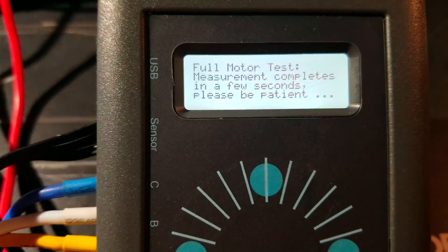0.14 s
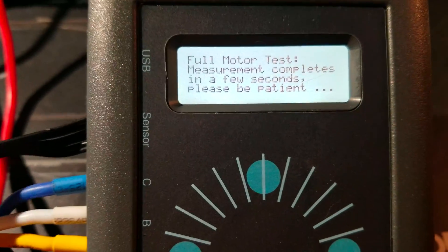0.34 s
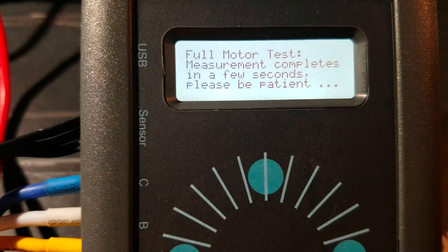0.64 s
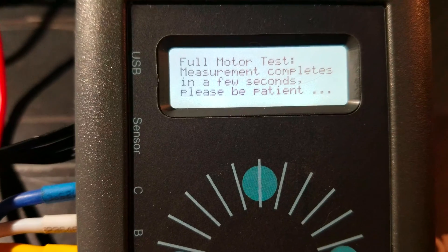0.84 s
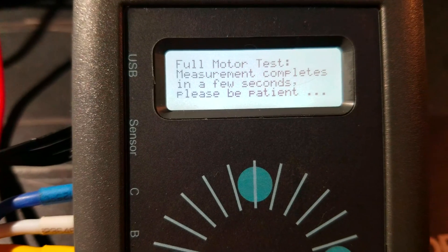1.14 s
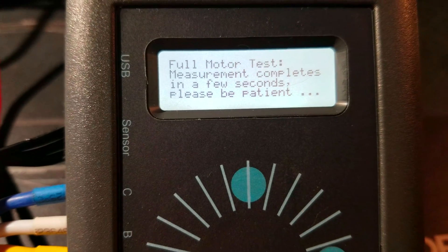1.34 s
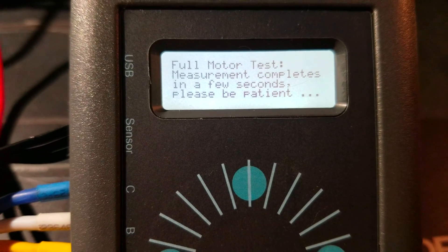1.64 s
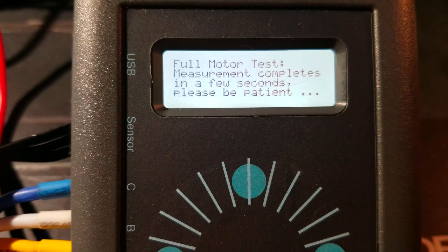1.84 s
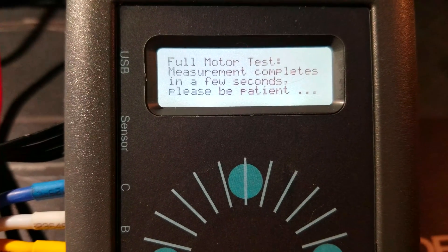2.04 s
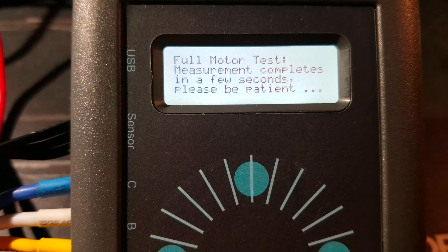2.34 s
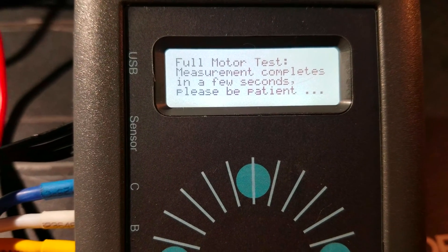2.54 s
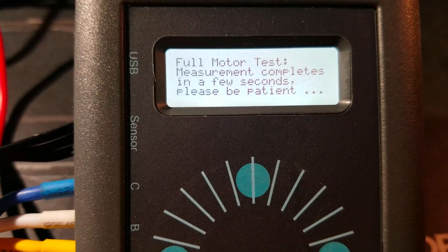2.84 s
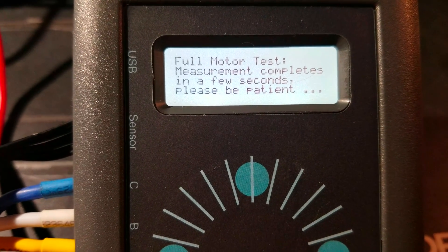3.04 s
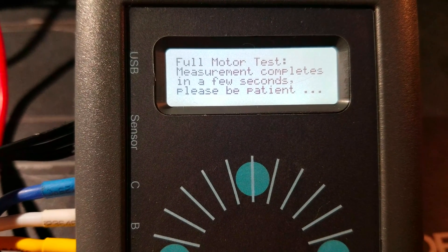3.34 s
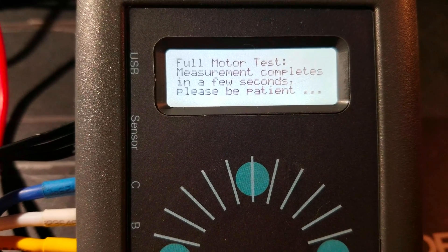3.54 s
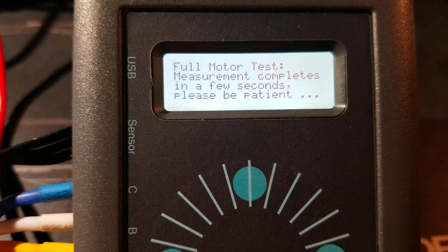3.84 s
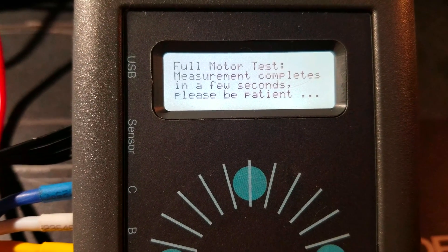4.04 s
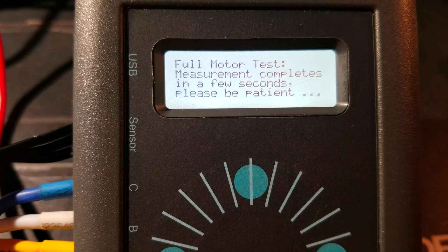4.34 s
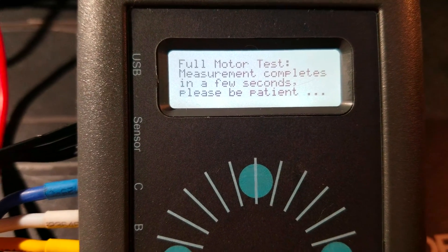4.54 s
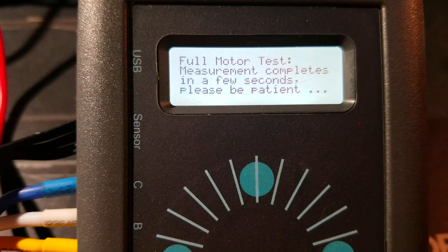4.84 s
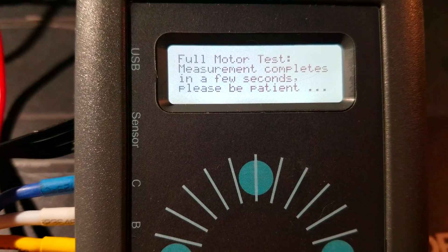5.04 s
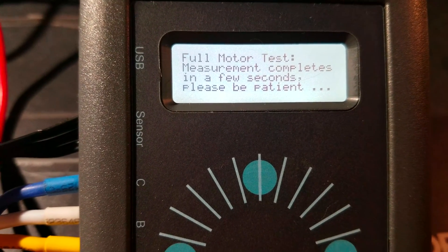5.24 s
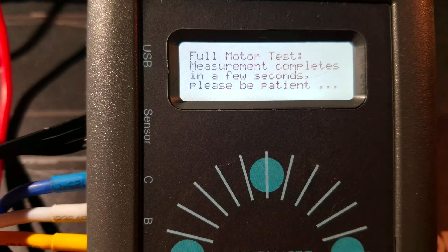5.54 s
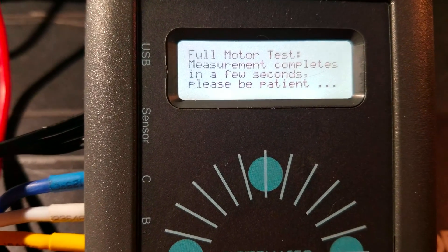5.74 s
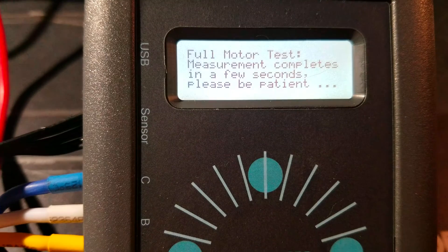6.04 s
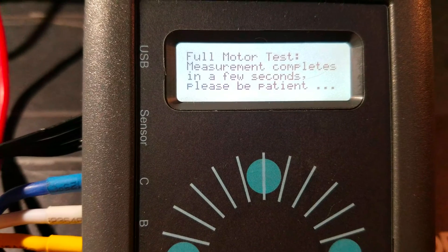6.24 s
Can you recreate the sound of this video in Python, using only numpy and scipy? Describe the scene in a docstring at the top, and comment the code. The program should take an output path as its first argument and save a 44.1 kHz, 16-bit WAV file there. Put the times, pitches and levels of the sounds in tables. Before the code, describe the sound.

A small electric motor knocks into life, whines upward to a rattling full speed, steps down with hard clacks, then coasts into a smoother, slower idle.

```python
"""A small brushless motor on a bench tester, close to a two-port microphone in a quiet room.
It starts with a knocking purr and runs up in a rising whine, with hard clacks and a thin climbing hiss.
It holds full speed, slows to half speed with more clacks, then coasts into a smoother, slower idle.
The rotor sings on multiples of its turn rate, its bearings rattle and hiss as impacts ring the case,
and the drive's switching whistles on top; low room air and mains hum lie behind it throughout."""
import sys
import numpy as np
from scipy import signal
from scipy.fft import rfft, irfft, next_fast_len
from scipy.io import wavfile
from scipy.ndimage import uniform_filter1d

SR = 44100
rng = np.random.default_rng(int(sys.argv[2]) if len(sys.argv) > 2 else 0)


def generate_wav(sig):
    """Save sig (samples, or channels by samples) to the path in sys.argv[1] as 16-bit PCM at SR."""
    pcm = np.round(np.clip(np.atleast_2d(sig).T, -1, 1) * 32767).astype(np.int16)
    wavfile.write(sys.argv[1], SR, pcm)


N = 281225
TIME, FREQS = np.arange(N) / SR, np.fft.rfftfreq(N, 1 / SR)  # seconds, Hz

TOP_SPEED, IDLE_SPEED = 370.7, 160.15  # turns per second
TOP_S, IDLE_S = 1.17, 4.625  # the run-up ends; the rotor coasts down to idle
KNOCK_ANGLE = .66  # where in the turn the rotor strikes, as a share of a turn

# The microphone's two ports. Each row: frequency in Hz, likeness of the ports from 0 to 1,
# phase lead of the right port in radians on top of its delay.
PORTS = [(100, 0.98, -0.08), (695, 0.76, 2.5), (1214, 0.66, 0), (1494, 0, 2.5), (1915, 0.24, 0.25),
         (2200, 1, 0.5), (2360, 0.77, 0.5), (3090, 0.6, -0.5), (3295, 0.13, -0.5), (3748, 0.98, -0.57),
         (4307, 1, -0.27), (4180, 0.24, 1.5), (4900, 0.73, -0.48), (6620, 0.66, -0.65), (7220, 1, -1.5),
         (8120, 0.76, -3.5), (9500, 0.3, -6), (10800, 0.3, -8), (12300, 0.5, -9), (13000, 0.9, -6.5),
         (14100, 0.4, -8.5), (15200, 0.8, -10.5)]


def amp(db):
    """Amplitude factor of a level in dB."""
    return 10 ** (np.asarray(db) / 20)


def unit(x):
    """The signal brought to rms 1."""
    return x / np.sqrt(np.mean(x ** 2) + 1e-20)


def over_pitch(rows, hz):
    """Each column of a spectrum, read on a log-frequency axis."""
    row_hz, *columns = np.transpose(rows)
    return np.array([np.interp(np.log(hz + 1), np.log(row_hz), column) for column in columns])


def wander(rate_hz):
    """Smooth chance of rms 1, up to about the given rate."""
    size = next_fast_len(N, True)
    spectrum = rfft(rng.standard_normal(size))
    smoothing = 1 + (np.fft.rfftfreq(size, 1 / SR) / rate_hz) ** 4
    return unit(irfft(spectrum / smoothing, size)[:N])


def port_phase(hz):
    """Phase at the left and right port; sound reaches the left one first."""
    delay_samples = 16
    lead = over_pitch(PORTS, hz)[1] - 2 * np.pi * hz * delay_samples / SR
    return np.array([0 * lead, lead])


def at_ports(a, b):
    """Spectra at both ports from two unrelated noises, shared as far as the ports are alike."""
    same = np.clip(over_pitch(PORTS, FREQS)[0], 0, 1)
    a, b = rfft(a), rfft(b)
    right = same * a + np.sqrt(1 - same ** 2) * b
    return np.array([a, right]) * np.exp(1j * port_phase(FREQS))


def tone(cycles, hz):
    """A sine of rms 1 at both ports."""
    return np.sqrt(2) * np.cos(2 * np.pi * (cycles + rng.random()) + port_phase(hz))


def set_speed(start_speed=60.2, overshoot_turns_per_s=2.4, overshoot_s=.6, settle_s=.108):
    """Turns per second: straight ramps, a slight overshoot at the top, then a coast down to idle."""
    # The tester's ramps. Each row: start in seconds, end in seconds, turns per second reached.
    ramps = [(0, .42, 189.6), (.42, .69, 268), (.69, 1.17, 370.7), (2.69, 3.2, 265), (3.2, 3.49, 185.2)]
    speed = np.full(N, start_speed)
    for start, end, reached in ramps:
        speed = speed + (reached - speed) * np.clip((TIME - start) / (end - start), 0, 1)
    speed = speed + overshoot_turns_per_s * np.exp(-abs(TIME - TOP_S) / overshoot_s)
    return IDLE_SPEED + (speed - IDLE_SPEED) * np.exp(-np.maximum(TIME - IDLE_S, 0) / settle_s)


def driven_whine(speed, turns, crawl_octave_db=7.5, blur_per_order=0.012, strain_blur=0.25, start_db=11,
                 flutter_hz=20, slip_turns=0.0032, full_strain=200, dip_db=-12, dip_s=0.037):
    """Rotor orders grow with speed, sweep through the case's resonances and shake with the loose rotor."""
    # Rotor tones under drive, ahead of the case. Each row: multiple of the turn rate, level in dB at full
    # speed, level in dB at half speed, dB added at full strain while the speed ramps.
    driven_orders = [(1, -2, -3.5, 4), (2, 9, 8.5, 0), (3, -4, -5, 6), (4, 4, -12.5, 5.5),
                     (5, -12.5, -10, 12), (6, 7, 1.5, -3), (7, 0, -0.5, 1), (8, 7, 5, -2), (9, 6.5, 0, -1),
                     (10, 8.5, -3, 0), (11, 7, 0, 0.5), (12, 11, -0.5, -2), (13, 6.5, 0, -2.5),
                     (14, 9, -0.5, 1), (15, 7.5, 0, -1.5), (16, 3, 4, -0.5), (17, 1, -5, -11),
                     (18, 5, 5, -3), (19, -8, 3, -1), (20, 3, 0, -17), (21, -3, -7, 3), (22, -1, 1, -4),
                     (23, -2, -4, -10)]
    # Orders that radiate mostly to the left at half speed and below.
    # Each row: multiple of the turn rate, dB added at the right port.
    leftward_orders = [(2, -7), (4, -4), (8, -10), (11, -3), (18, -7)]
    # How motor case and bench pass the tones. Each row: frequency in Hz, left gain in dB, right gain in dB.
    case_gain = [(125, -57, -59), (204, -58.5, -64), (262, -53.5, -61), (314, -59.5, -56.5),
                 (347, -70, -77), (383, -53.5, -64), (460, -57.5, -59), (525, -52.5, -62), (561, -55, -56),
                 (617, -75, -64), (663, -54, -69), (700, -47, -58), (740, -46, -59), (790, -47.5, -57),
                 (890, -44, -49), (925, -48, -52), (1000, -50.5, -53), (1100, -56.5, -58),
                 (1170, -42.5, -56), (1290, -46, -54.5), (1330, -43.5, -51), (1460, -49, -48.5),
                 (1550, -50, -49.5), (1670, -41.5, -46), (1800, -52, -50.5), (1950, -44, -54),
                 (2080, -48, -51), (2225, -47, -48), (2410, -50.5, -51), (2740, -57, -57), (2840, -49, -50),
                 (2983, -46, -43), (3110, -44, -46), (3210, -46.5, -49), (3420, -47, -47.5),
                 (3530, -60, -50), (3900, -46, -46.5), (4060, -56, -56), (4270, -56, -52), (4500, -63, -60),
                 (4850, -61, -42.5), (5200, -54, -37.5), (5460, -55, -44.5), (6600, -55, -53),
                 (7340, -59, -39), (8100, -52, -60)]
    # A case mode howls briefly as a tone passes it. Each row: middle in seconds, half length in seconds,
    # frequency in Hz, half width in Hz, lift in dB.
    howl_rows = [(1.16, 0.029, 2990, 220, 4), (1.213, 0.043, 2990, 220, 8.5), (3.02, 0.021, 3050, 100, 2),
                 (3.16, .025, 3300, 80, 7), (3.208, 0.028, 785, 90, 11), (3.438, 0.086, 2960, 150, 5)]
    out = np.zeros((2, N))
    octaves = np.log2(speed / (TOP_SPEED / 2))  # above half speed
    # speeding up or braking loads the rotor unevenly, which shifts the balance of the orders
    acceleration = abs(np.gradient(set_speed())) * SR  # turns per second, per second
    strain = np.clip(uniform_filter1d(acceleration, SR // 10) / full_strain, 0, 1)
    howls = [(db * np.exp(-((TIME - s) / length) ** 2), hz, width) for s, length, hz, width, db in howl_rows]
    dip = dip_db * np.exp(-((TIME - TOP_S - dip_s / 2) / dip_s) ** 2)  # the main tone dips as the run-up ends
    for order, full_db, half_db, strain_db in driven_orders:
        hz = order * speed
        db = np.interp(octaves, [0, 1], [half_db, full_db])
        db = db + crawl_octave_db * np.minimum(octaves, 0) + strain_db * strain
        db = db + sum(howl * np.exp(-np.minimum(((hz - at) / width) ** 2, 20)) for howl, at, width in howls)
        if order == 2:  # the main tone is clear from the very start
            db = db + dip + start_db * np.interp(speed, [60, 140], [1, 0])
        ports_db = db + over_pitch(case_gain, hz)
        ports_db[1] += dict(leftward_orders).get(order, 0) * np.interp(octaves, [0, .5], [1, 0])
        # low orders stay nearly pure; a growing share of the higher ones is blurred, more under strain
        blur = np.clip(blur_per_order * max(order - 2, .5) + strain_blur * strain * (order > 4), 0, 1)
        flutter = np.sqrt(1 - blur) + np.sqrt(blur) * wander(flutter_hz)
        angle = turns + slip_turns * wander(flutter_hz)
        out += amp(ports_db) * flutter * tone(order * angle, hz)
    return out


def idle_whine(speed, turns, idle, mode_hz=1690, mode_width_hz=55, mode_db=8.5, slip_turns=0.0016,
               coast_db=-4.0, coast_speed=10, coast_above_hz=2400):
    """Running smoothly, every turn is alike: a tall stack of clean lines, lifted as one glides by a case mode."""
    # Rotor tones at idle. Each row: multiple of the turn rate, left level in dB, right level in dB.
    idle_orders = [(1, -61, -66), (2, -61, -53), (4, -56, -68), (5, -56, -61), (6, -45.5, -56.5),
                   (7, -70, -64), (8, -58, -57), (9, -54, -72), (10, -39, -46), (11, -57, -57),
                   (12, -47, -46), (13, -59, -62), (14, -58, -59), (16, -42, -43), (17, -60, -65),
                   (18, -55, -57), (19, -54, -53), (20, -49, -47), (21, -61, -60), (22, -58, -58),
                   (23, -59, -60), (24, -49, -49), (25, -55, -55), (26, -53, -53), (27, -57, -50),
                   (28, -56, -57), (29, -58, -54), (30, -55, -46), (31, -65, -51), (32, -56, -46),
                   (33, -62, -46), (34, -61, -43), (35, -60, -43), (36, -54, -44), (37, -61, -46),
                   (38, -60, -45), (39, -57, -45), (40, -56, -44), (42, -58, -55), (43, -60, -54),
                   (44, -58, -48), (45, -60, -45), (46, -58, -45), (47, -57, -50), (48, -54, -54),
                   (49, -56, -56), (50, -49, -62), (51, -57, -56), (52, -53, -60), (53, -54, -75),
                   (54, -56, -72), (55, -55, -75), (56, -57, -75)]
    # The balls roll at no whole multiple of the shaft.
    # Each row: multiple of the turn rate, left level in dB, right level in dB.
    ball_tones = [(10.55, -57, -64), (12.57, -58, -69), (16.57, -58, -58), (18.55, -58, -55),
                  (20.57, -53, -55), (22.55, -55, -55), (26.55, -54, -49), (28.57, -59, -56),
                  (29.58, -61, -52), (30.59, -53, -37), (31.56, -58, -44), (32.57, -58, -41),
                  (33.58, -61, -48), (34.55, -63, -47), (36.57, -64, -50), (39.56, -73, -54),
                  (40.57, -71, -55), (44.57, -58, -50), (45.58, -60, -50), (46.55, -61, -49),
                  (50.55, -58, -61)]
    out, on = np.zeros((2, N)), idle > 0
    unsettled = np.clip((speed[on] - IDLE_SPEED) / coast_speed, 0, 1)
    cage_turns = turns + slip_turns * wander(6.2)  # the balls slip a little against the shaft
    for rows, angle, peak_db in ((idle_orders, turns, mode_db), (ball_tones, cage_turns, 0)):
        for order, left_db, right_db in rows:
            hz = order * speed[on]
            lift_db = peak_db * np.exp(-((hz - mode_hz) / mode_width_hz) ** 2)
            # the upper lines stay weak while it still coasts
            lift_db = lift_db + coast_db * unsettled * (order * IDLE_SPEED > coast_above_hz)
            out[:, on] += amp([[left_db], [right_db]]) * amp(lift_db) * tone(order * angle[on], hz)
    return idle * out


def rattle_levels(idle, sway_db=0.54, sway_hz=9, idle_calm=0.43, crawl_speed=150, crawl_db=-14.5):
    """Level in dB of each band of the rattle: it follows speed and run-up current, and sways by chance."""
    # How the bearing rattle follows speed and drive; the rows are body, lower ring, upper ring, hiss, fizz.
    # Each row: level in dB at top speed, dB per octave of speed, dB at full run-up current, dB added at idle.
    rattle_law = [(-28.5, 0.33, 0, -7.5), (-25.5, 8, 6.5, -4.5), (-25.5, 5.5, 3, -5.5), (-25.5, 6, 8, -2),
                  (-25.5, 5.5, 2, -0.5)]
    # The rattle swells or drops briefly. Each row: middle in seconds, half length in seconds, change in dB.
    swells = [(0.133, 0.041, 3.5), (0.328, 0.037, 1), (0.464, 0.054, -2.5), (1.173, 0.052, -3.5),
              (1.286, 0.0093, 3), (1.754, .03, -2), (2.867, 0.044, -0.8), (2.99, 0.067, 1.5),
              (3.437, 0.028, -1.5), (3.655, 0.031, 2), (3.79, 0.055, -1), (4.21, 0.038, 1.5),
              (4.717, 0.044, 1)]
    speed = set_speed()
    current = np.maximum(1 - speed / TOP_SPEED, 0) * (TIME < TOP_S)  # falls as the rotor gains speed
    # below the crawl speed (turns per second) the rattle dies away, by crawl_db at standstill
    shared_db = crawl_db * np.maximum(1 - speed / crawl_speed, 0)
    shared_db = shared_db + sway_db * (1 - idle_calm * idle) * wander(sway_hz)
    shared_db = shared_db + sum(db * np.exp(-((TIME - s) / length) ** 2) for s, length, db in swells)
    octaves = np.log2(speed / TOP_SPEED)
    return [shared_db + top_db + octave_db * octaves + current_db * current + idle_db * idle
            for top_db, octave_db, current_db, idle_db in rattle_law]


def rotor_knock(turns, slow_db=10, cruise_db=2, length_turns=0.12):
    """Turning slowly, the rotor shakes the bearings with each knock; speed smooths that away."""
    speed = np.gradient(turns) * SR
    knot_db = [5, slow_db, slow_db, cruise_db, cruise_db, 0]
    strength_db = np.interp(speed, [59.4, 94, 138, 166, 190, 300], knot_db)
    return 1 + (amp(strength_db) - 1) * np.exp(-((turns - KNOCK_ANGLE) % 1) / length_turns)


def worn_track(turns, count=95):
    """Roughness that the balls pass again on every turn, from equally strong harmonics of the turn."""
    size = 4096  # points around the track
    track = irfft(np.r_[0, np.exp(2j * np.pi * rng.random(count))], size)
    return unit(np.interp(turns % 1 * size, np.arange(size), track))


def impact_force(turns, idle, grain_db=2.0, idle_grain_db=0.5, grain_hz=900, surge_db=0.83, surge_hz=35):
    """Strength of the tiny impacts, bunched by rotor angle and surging as the rotor shifts in its play."""
    # Bunches at fixed rotor angles. Each row: bunches per turn, depth 0-1 under drive, depth 0-1 at idle.
    bunches = [(1, .13, .01), (2, .2, .09), (3, .14, .03), (4, .14, .18), (6, .12, .08), (8, .08, .3),
               (16, 0, .16)]
    grain = (grain_db + (idle_grain_db - grain_db) * idle) * wander(grain_hz)
    surge = surge_db * (1 - 0.7 * idle) * wander(surge_hz)
    force = amp(grain + surge)
    for order, driven, smooth in bunches:
        depth = driven + (smooth - driven) * idle
        force = force * (1 + depth * np.cos(2 * np.pi * (order * turns + rng.random())))
    force = force * (idle + (1 - idle) * rotor_knock(turns))
    force = force / np.sqrt(uniform_filter1d(force ** 2, SR // 6))  # even out the slow level
    ceiling = np.interp(set_speed(), [160, 300], [6, 2.4])  # at speed no single impact stands far out
    return unit(ceiling * np.tanh(force / ceiling))


def bearings(turns, idle, repeat_share=0.036, cruise_repeat_share=0.11, steady_share=0.14):
    """Dense tiny impacts, partly the same on every turn, ring the case over an even rolling hiss."""
    # The rattle's colour as the case rings. Each row: frequency in Hz, left gain in dB, right gain in dB.
    rattle_colour = [(308, -24, -34), (610, -43, -56), (724, -18, -21.5), (905, -23, -27),
                     (1400, -18.5, -20.5), (1830, -20, -21.5), (2340, -14.5, -16.5), (2850, -16, -18),
                     (2920, -14, -9), (3330, -14, -13), (3580, -17, -16), (4100, -15, -15), (4445, -9, -8),
                     (4940, -13, -1), (5330, -15.5, 0.5), (5710, -24, -3), (5920, -15.5, -3.5),
                     (6800, -13.5, -8.5), (7060, -9.5, -2), (7400, -15, -1.5), (8100, -9.5, -11.5),
                     (9100, -15, -38), (10430, -16, -34.5), (10820, -9, -20.5), (11500, -12.5, -26),
                     (12100, -10, -22), (12650, -13.5, -13), (13100, -14, -14.5), (13800, -8.5, -18),
                     (14700, -9, -12), (15600, -11, -6.5)]
    force = impact_force(turns, idle)
    driven_repeats = np.interp(set_speed(), [130, 185, 300], [0, cruise_repeat_share, 0])
    repeats = np.clip(repeat_share * idle + (1 - idle) * driven_repeats, 0, 1)
    hits = [force * np.sqrt(1 - repeats) * rng.standard_normal(N) + np.sqrt(repeats) * worn_track(turns)
            for _ in range(2)]
    low = np.interp(FREQS, [3050, 4807], [1.01, 0])
    high = np.interp(FREQS, [7700, 9100], [0, 1.15])
    top = np.interp(FREQS, [12900, 12600], [0, 1.0])  # descending knots: a hard step, kept in this order
    # away from the case's ring, even rolling hiss takes a share
    steady = np.clip(steady_share * (low + top), 0, 1)
    rolling = at_ports(*rng.standard_normal((2, N)))
    rattle = np.sqrt(1 - steady) * at_ports(*hits) + np.sqrt(steady) * rolling
    low_cut = FREQS ** 2 / (FREQS ** 2 + 200 ** 2)
    rattle = rattle * amp(over_pitch(rattle_colour, FREQS)) * low_cut
    ring, upper = 1 - low - high, np.interp(FREQS, [5300, 5600], [0, 1])
    # body, lower ring, upper ring, hiss, fizz
    shapes = (low, ring * (1 - upper), ring * upper, high - top, top)
    bands = [irfft(rattle * shape, N) for shape in shapes]
    ring_rms = np.std(irfft(rattle.mean(0) * ring, N))
    return sum(amp(db) * band for db, band in zip(rattle_levels(idle), bands)) / ring_rms


def struck_case(since_s, rise_s=0.00035):
    """The case's short ring, of peak 1, given the time since the last blow."""
    # What a knock of the rotor rings in the case.
    # Each row: frequency in Hz, left level in dB, right level in dB, time in seconds to fall by 60 dB.
    knock_modes = [(2880, -7, -7, 0.0045), (5740, -24, -1, 0.0045), (6020, -13, 0.5, 0.0064),
                   (7300, -7, 1, 0.0067), (10600, -8, -17, .002), (14000, -9, -12, .0015)]
    ring = np.zeros((2, N))
    for hz, left_db, right_db, t60 in knock_modes:
        decay = amp(-60 * since_s / t60)
        swing = np.cos(2 * np.pi * hz * since_s + port_phase(np.array([hz])))
        ring += amp([[left_db], [right_db]]) * decay * swing
    ring = ring * (1 - np.exp(-since_s / rise_s))
    return ring / abs(ring).max()


def knocks(speed, turns):
    """Starting up, the rotor strikes once a turn, a purr that quickens and fades; it also clacks now and then."""
    # Strength of the once-a-turn knock in the run-up. Each row: speed in turns per second, peak in dB.
    purr_strength = [(60, -30), (87, -23), (91, -22), (118, -22), (123, -12), (150, -16.5), (175, -14.5),
                     (210, -53)]
    # Single harder clacks of the loose rotor. Each row: start in seconds, peak in dB.
    clacks = [(0.383, -15), (.411, -9.5), (.452, -10.5), (0.509, -8), (3.217, -9.5), (3.276, -4.5),
              (3.389, -10), (4.564, -15), (4.607, -11)]
    purr_level = amp(np.interp(speed, *np.transpose(purr_strength))) * (TIME < TOP_S)
    purr = purr_level * struck_case((turns - KNOCK_ANGLE) % 1 / speed)
    start_s, db = np.transpose(clacks)
    last = np.maximum(np.searchsorted(start_s, TIME) - 1, 0)
    return purr + amp(db[last]) * struck_case(np.maximum(TIME - start_s[last], 0))


def sizzle(speed, base_hz=8950, hz_per_speed=15, width_hz=310, attack_s=.02, release_s=0.41, right_db=-6):
    """A thin band of hiss late in the run-up, whose centre rises with the speed."""
    # One row: start in seconds, end in seconds, level in dB.
    start, end, db = (0.49, 1.4, -34.5)
    fade_in = np.clip((TIME - start) / attack_s, 0, 1)
    fade_out = np.clip((end - TIME) / release_s, 0, 1)
    angle = 2 * np.pi * np.cumsum(base_hz + hz_per_speed * speed) / SR
    bands = [wander(width_hz) * np.cos(angle) + wander(width_hz) * np.sin(angle) for _ in range(2)]
    return amp(db) * fade_in * fade_out * irfft(at_ports(*bands), N) * amp([[0], [right_db]])


def switching(speed, turns, idle, switching_hz=15957, fast_db=-10, right_db=-4):
    """The windings whistle at the switching rate less multiples of the turn rate: lines fall as speed rises."""
    # Whistles below the switching rate, ahead of the fade with speed.
    # Each row: multiple of the turn rate, level in dB under drive, level in dB at idle.
    sidebands = [(2, -33, -35), (4, -37.5, -47), (5, -53, -60), (6, -39, -51), (8, -56, -46),
                 (14, -45, -54)]
    out = np.zeros((2, N))
    fade_db = np.interp(speed, [0, 100, 200, 370], [-12, -4, 0, fast_db])
    for order, driven_db, idle_db in sidebands:
        level_db = driven_db + (idle_db - driven_db) * idle + fade_db
        out += amp(level_db) * tone(switching_hz * TIME - order * turns, switching_hz - order * speed)
    return out * amp([[0], [right_db]])


def room(level_db=-56, hum_right_db=-7.0):
    """Low steady air as shaped noise, and mains hum as slowly wavering sines."""
    # The room's background. Each row: frequency in Hz, relative level in dB per Hz.
    air_colour = [(20, -21), (45, -1), (65, 0), (100, -0.5), (155, -2), (200, -6), (255, 4), (400, -6.5),
                  (600, -6), (1200, -42), (4000, -40), (15000, -45)]
    # Mains hum. Each row: frequency in Hz, level in dB at the left port.
    hum_lines = [(120, -59.5), (180, -66.5)]
    air = irfft(at_ports(*rng.standard_normal((2, N))) * amp(over_pitch(air_colour, FREQS)), N)
    hum = sum(amp(db + 1.9 * wander(4.3)) * tone(hz * TIME, np.array([hz])) for hz, db in hum_lines)
    return amp(level_db) * unit(air) + hum * amp([[0], [hum_right_db]])


def scene():
    """One rotor angle plays every layer of the motor, with the room behind."""
    smoothing_s = 0.039  # how soon it runs smoothly once the rotor starts coasting down to idle
    idle = 1 - np.exp(-np.maximum(TIME - IDLE_S, 0) / smoothing_s)  # share 0-1 of smooth idling
    # the speed trembles under drive, in turns per second, and far less at idle
    hunting = (1 - 0.9 * idle) * 0.748 * wander(35.3)
    speed = set_speed() + hunting
    turns = np.cumsum(speed) / SR
    whine = (1 - idle) * driven_whine(speed, turns) + idle_whine(speed, turns, idle)
    rattle = bearings(turns, idle) + knocks(speed, turns)
    return whine + rattle + sizzle(speed) + switching(speed, turns, idle) + room()


def record(dry):
    """The recorder's band limit: a steep low-pass."""
    edge_hz = 15750
    low_pass = signal.firwin(1023, edge_hz, window=("kaiser", 9), fs=SR)
    return signal.oaconvolve(dry, low_pass[None], "same")


dry = scene()
out = record(dry)
generate_wav(out)
```